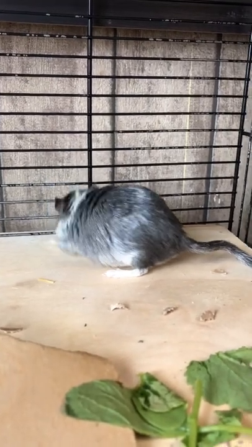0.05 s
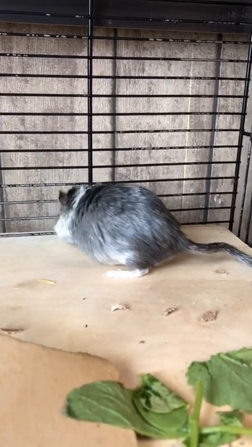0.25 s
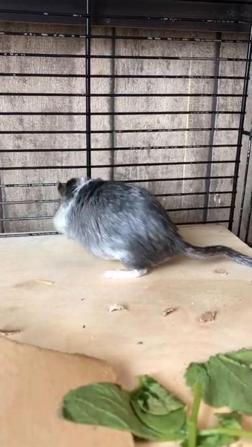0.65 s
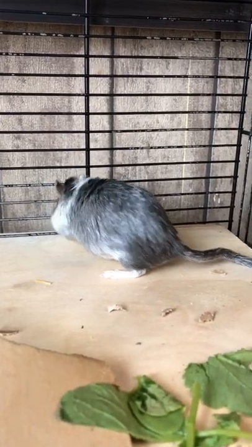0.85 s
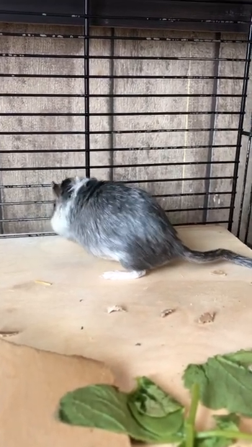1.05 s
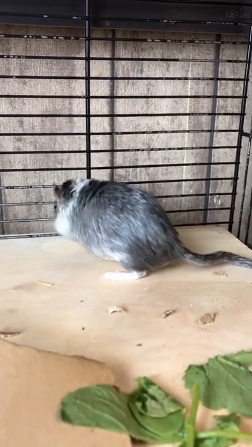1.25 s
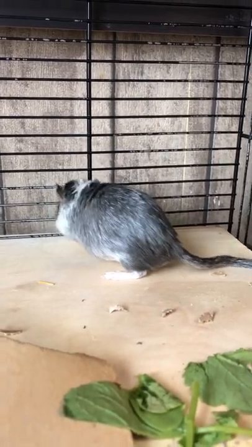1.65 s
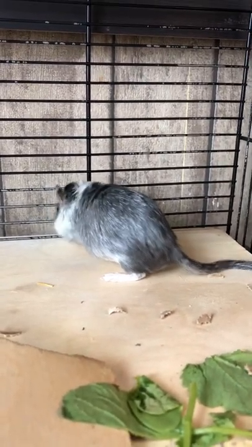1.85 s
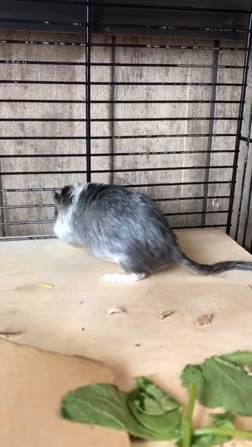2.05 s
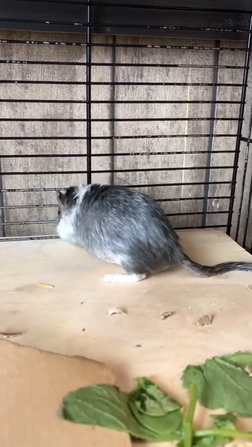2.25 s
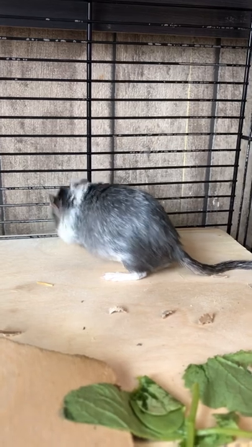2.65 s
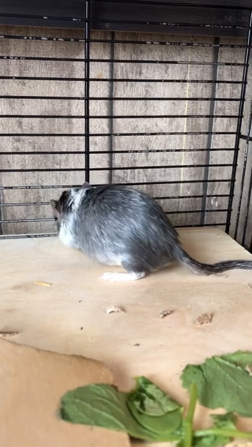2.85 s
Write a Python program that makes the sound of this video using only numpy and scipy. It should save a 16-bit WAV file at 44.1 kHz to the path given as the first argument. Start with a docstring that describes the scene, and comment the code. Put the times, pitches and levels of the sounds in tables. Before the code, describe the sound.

Teeth chattering from a small rodent starts softly, then becomes a dense run of dry, scratchy ticks before ending. It is heard close up, with slight pings from the wire cage and a low, steady indoor hum.

```python
"""A small rodent in a wire cage rattles its teeth, close by, in a quiet room.
Each stroke of the teeth is a tick and a short rasp of tiny slips; hard strokes ring brighter.
The cage and room answer faintly over a low steady hum."""
import sys
import numpy as np
from scipy import signal
from scipy.fft import rfft, irfft, next_fast_len
from scipy.io import wavfile
from scipy.ndimage import map_coordinates

SR = 44100
rng = np.random.default_rng(int(sys.argv[2]) if len(sys.argv) > 2 else 0)


def dump_mix(stems):
    """Bounce the given channels to the path in sys.argv[1] as a 16-bit WAV at rate SR."""
    frames = np.atleast_2d(stems).T  # one column per channel
    limited = np.clip(frames, -1, 1)  # hard clip at full scale
    pcm = np.round(limited * 32767).astype(np.int16)
    wavfile.write(sys.argv[1], SR, pcm)


N = 127890

# tooth strokes: (start s, length s, level dB)
STROKES = [(0.036, 0.0082, -62.5), (0.149, 0.012, -62.5), (0.181, 0.0035, -51.5), (0.2078, 0.0075, -43.5),
           (0.2199, 0.024, -49), (0.2486, 0.019, -46), (0.281, 0.0031, -34), (0.2984, 0.027, -35.5),
           (0.3423, 0.006, -35), (0.3536, 0.01, -37), (0.3654, 0.011, -42.0), (0.3813, 0.0081, -34),
           (0.4133, 0.014, -40.5), (0.4299, 0.01, -35.5), (0.4536, 0.011, -39.0), (0.4707, 0.028, -32.5),
           (0.5144, 0.0066, -30.5), (0.5243, 0.0081, -34.5), (0.5405, 0.008, -39.5), (0.5591, 0.003, -31.5),
           (0.5727, 0.01, -40.5), (0.5909, 0.0047, -35), (0.6056, 0.013, -33), (0.6288, 0.012, -40.5),
           (0.6484, 0.018, -33), (0.688, 0.0038, -33.5), (0.7068, 0.012, -35.5), (0.7317, 0.013, -28.5),
           (0.7654, 0.002, -41), (0.7742, 0.011, -33.5), (0.7986, 0.005, -34), (0.8163, 0.011, -29.5),
           (0.8581, 0.0078, -31.5), (0.8801, 0.0043, -35), (0.8953, 0.0076, -33), (0.9117, 0.0123, -30.5),
           (0.942, 0.0084, -31.5), (0.9791, 0.016, -35.5), (0.9974, 0.0049, -30.5), (1.0349, 0.0046, -34.5),
           (1.0498, 0.0059, -32.5), (1.0721, 0.01, -33), (1.0931, 0.012, -31.5), (1.1152, 0.0034, -36.5),
           (1.1252, 0.0042, -34.5), (1.1402, 0.015, -35), (1.1645, 0.016, -34), (1.1858, 0.03, -36.0),
           (1.229, 0.011, -32.5), (1.2598, 0.01, -35.0), (1.278, 0.017, -34.5), (1.3102, 0.0144, -32.5),
           (1.3691, 0.0032, -35), (1.3932, 0.0091, -37), (1.4246, 0.0019, -43), (1.4337, 0.015, -34.5),
           (1.45, 0.002, -39), (1.4736, 0.012, -27.5), (1.5022, 0.0079, -35.5), (1.5268, 0.01, -35),
           (1.5476, 0.0064, -36), (1.5719, 0.013, -27.5), (1.5991, 0.0056, -32.0), (1.6225, 0.0075, -35),
           (1.6394, 0.0085, -38.0), (1.6571, 0.011, -26.5), (1.6951, 0.0063, -33.5), (1.7151, 0.0033, -30.5),
           (1.7276, 0.016, -39), (1.7513, 0.013, -30), (1.7702, 0.044, -36.5), (1.827, 0.022, -31),
           (1.866, 0.023, -37), (1.8977, 0.0067, -37.5), (1.9173, 0.012, -31.5), (1.9294, 0.0092, -33.0),
           (1.9573, 0.013, -37.5), (1.978, 0.0126, -34), (1.9986, 0.0065, -34.5), (2.0088, 0.028, -34.5),
           (2.0637, 0.015, -32.0), (2.0924, 0.0224, -34), (2.162, 0.0087, -32.5), (2.2015, 0.008, -33),
           (2.2374, 0.013, -39), (2.2615, 0.0014, -28.5), (2.266, 0.015, -39), (2.3005, 0.01, -27.5),
           (2.3308, 0.0068, -37.5), (2.3498, 0.0064, -34.5), (2.3707, 0.037, -38), (2.3974, 0.019, -35),
           (2.4233, 0.01, -39), (2.4424, 0.011, -34), (2.4616, 0.016, -36), (2.4833, 0.0062, -32.0),
           (2.4997, 0.0096, -31.5), (2.5375, 0.011, -36), (2.5595, 0.027, -34), (2.5982, 0.038, -43)]
SLIPS_PER_S, SLIP_SCATTER_DB = 6000, 3
ATTACK_S, RELEASE_S, SWELL_DB = 0.00035, 0.0018, 4.5  # a stroke swells towards its middle
RASP_DB = 0.7
# broad colour of the rasp: (Hz, dB)
RASP = [(150, -31.5), (500, -21), (720, -26), (850, -15.5), (1480, -19), (2200, -12), (3100, -7), (3500, -12), (4100, -13), (5000, -1), (5750, -14.5), (6500, -8), (9500, -14.5), (11700, -8), (13900, -21), (15600, -19)]
# resonances of teeth and cage: (Hz, width Hz, dB)
RESONANCES = [(1065.0, 90.0, -9.5), (1675.0, 56.0, -3.5), (1903.0, 42.0, -4.5), (2113.0, 56.0, -7.0),
              (2402.0, 36.0, -5.0), (2572.0, 56.0, -3.5), (3778.0, 222.0, -7.0), (4467.0, 43.0, -1.0),
              (4640.0, 68.0, 0.0), (5494.0, 96.0, -3.0), (6028.0, 154.0, -1.0), (8070.0, 360.0, -1.0),
              (9176.0, 516.0, -1.0), (9995.0, 216.0, -1.0), (10808.0, 167.0, -2.0)]  # fixed
BITE_HZ, BITE_WIDTH_HZ, BITE_DB = 7040, 405, -6  # the ring of a hard stroke
ROOM = [(200, 0.72), (1700, 0.37), (5000, 0.15), (10000, 0.061), (16000, 0.046)]
ROOM_DB = -12
# room air: (Hz, dB per Hz)
AIR = [(20, -36), (45, -16), (65, -1.5), (100, -6), (185, -1), (230, -10), (500, -12.5), (720, -20), (1700, -31), (16000, -40.5)]
AIR_DB = -59.5
HUM = [(71, -71.5), (119, -74), (161, -61.5)]
# low murmur of the cage floor under the animal: (Hz, width Hz, dB)
BOARD_HZ, BOARD_WIDTH_HZ, BOARD_DB = 170, 66, -25.5
TOP_HZ = 15830  # fixed
# long faint ring of the cage wires: (Hz, dB, t60 s)
WIRES = [(1640, -27.5, 0.67), (2400, -38.5, 0.36), (10000, -38.5, .3)]
PING_HZ, PING_SCATTER_HZ, PING_T60_S = 4630, 150, 0.024  # the ring of the near bars
CHATTER_DB, CHATTER_PER_S = 1, 450  # the grip wavers within a stroke
SCATTER_DB, SCATTER_S = -10, 0.00057  # reflections off the floor and bars, new for each stroke
COLOUR_DB, COLOUR_STEP_HZ = 0.42, 1408  # each stroke has a colour of its own
HUM_WAVER_DB = 4
USUAL_DB, BITE_GROWS = -36, 1  # the ring gains this much for each dB above a usual stroke
TICK_SCATTER_DB = None
DRAG_FROM_S, DRAG_TO_S, DRAG_DB = .21, 2.635, -51  # light rubbing between strokes
DARKEN_DB, DARKEN_HZ = 4.5, 7300  # over a stroke the weight shifts from above this pitch to below it
RESONANCE_SCATTER_DB = 1.5  # each stroke stirs the resonances in its own proportions
# one of the cage bars pings as some strokes let go: (s, level dB)
PINGS = [(.532, -36), (.613, -34), (.782, -33.5), (.866, -37), (1.664, -35), (1.986, -41), (2.208, -40), (2.309, -33.5)]
TICK_DB, TICK_GROWS, TICK_S = -29.5, 0.26, 0.00052  # the teeth catch at the start of a usual stroke; dB gained for each dB harder
BARS_WIDTH_HZ, BARS_DB, BARS_DELAY_S = 450, -19, 0.0076  # the near bars answer every stroke a moment later


def amp(db):
    """Decibels to gain."""
    return 10 ** (np.asarray(db) / 20)


def unit(x):
    """Scale to rms 1."""
    return x / np.sqrt(np.mean(x ** 2) + 1e-20)


def along(points, hz):
    """(Hz, value) points on a log axis."""
    f, v = np.transpose(points)
    return np.interp(np.log(hz + 1), np.log(f + 1), v)


def wobble(rate):
    """A smooth random curve, rate knots a second."""
    return map_coordinates(rng.standard_normal(int(N * rate / SR) + 4), [np.arange(N) * rate / SR])


def resonance(f, hz, width_hz):
    """Gain of one resonance, 1 at its top."""
    return np.abs(f * width_hz / (hz * hz - f * f + 1j * f * width_hz))


def coloured(x, gain, size=16384):
    """x through a causal filter of energy 1 with the shape gain(Hz)."""
    cep = irfft(np.log(np.maximum(gain(np.fft.rfftfreq(size, 1 / SR)), 1e-6)))
    cep[1:size // 2] *= 2
    cep[size // 2 + 1:] = 0
    ring = irfft(np.exp(rfft(cep)))
    return signal.fftconvolve(x, ring / np.linalg.norm(ring))[:N]


def slips(rate):
    """Tiny slips of random size at random moments, rms 1."""
    sizes = amp(SLIP_SCATTER_DB * rng.standard_normal(N)) * rng.choice([-1, 1], N)
    return unit(sizes * (rng.random(N) < rate / SR))


def strokes(rows, size=4096):
    """Each stroke catches with a tick, swells, darkens and lets go; a hard one rings brightly. Returns sound and force."""
    sound, force, t = np.zeros(N), np.zeros(N), np.arange(size) / SR
    f = np.fft.rfftfreq(size, 1 / SR)
    bright = coloured([1.], lambda f: resonance(f, BITE_HZ, BITE_WIDTH_HZ))[:size]
    grain, catch = slips(SLIPS_PER_S) * amp(CHATTER_DB * wobble(CHATTER_PER_S)), rng.standard_normal(N)
    for (s, length, db), stir in zip(rows, rng.standard_normal((len(rows), len(RESONANCES)))):
        at, length = slice(round(s * SR), round(s * SR) + size), max(length, TICK_S)
        to_level = lambda x: x[:size] * amp(db) * np.sqrt(length * SR) / np.linalg.norm(x)
        progress = np.minimum(t / length, 1)
        swell = amp(SWELL_DB * (np.sin(np.pi * progress) - 0.5))
        shape = (1 - np.exp(-t / ATTACK_S)) * swell * np.exp(-np.maximum(t - length, 0) / RELEASE_S)
        dull, darken = irfft(rfft(grain[at]) * (f < DARKEN_HZ)), amp(DARKEN_DB * (progress - 0.5))
        rub = shape * (dull * darken + (grain[at] - dull) / darken)
        tick = amp(TICK_DB + TICK_GROWS * (db - USUAL_DB)) * np.exp(-t / TICK_S) * catch[at]
        rasp = to_level(scattered(to_level(rub) + tick) * (t < length + 10 * RELEASE_S))
        force[at] += rasp
        plain = coloured(rasp, lambda f: body(f, RESONANCE_SCATTER_DB * stir), size=size)
        bite = amp(BITE_DB + BITE_GROWS * (db - USUAL_DB)) * to_level(signal.fftconvolve(rasp * swell, bright))
        sound[at] += to_level(to_level(plain) + bite)
    return sound, force


def teeth():
    """Strokes with light rubbing between them; both ring the cage wires, and the strokes shake the floor."""
    sound, force = strokes(STROKES)
    t = np.arange(N) / SR
    drag = amp(DRAG_DB) * ((t > DRAG_FROM_S) & (t < DRAG_TO_S)) * slips(SLIPS_PER_S)
    board = coloured(force, lambda f: resonance(f, BOARD_HZ, BOARD_WIDTH_HZ) ** 2)
    return amp(RASP_DB) * sound + coloured(drag, body) + amp(BOARD_DB) * board + wires(force + drag)


def room(x):
    """A faint tail in which each frequency dies at its own speed."""
    hz, t, z = signal.stft(rng.standard_normal(SR // 2), SR, nperseg=256)
    tail = signal.istft(z * amp(-60 * t / along(ROOM, hz)[:, None]), SR, nperseg=256)[1]
    return signal.fftconvolve(x, tail / np.linalg.norm(tail))[:N]


def background():
    """Room air and a low hum that wavers."""
    t = np.arange(N) / SR
    hum = sum(amp(db + HUM_WAVER_DB * wobble(11.02)) * np.sqrt(2) * np.sin(2 * np.pi * hz * t + 1.3 * wobble(7)) for hz, db in HUM)
    return hum + amp(AIR_DB) * unit(coloured(rng.standard_normal(N), lambda f: amp(along(AIR, f))))


def scattered(x):
    """One stroke with its own smooth colour and its own cluster of near reflections."""
    t, f = np.arange(len(x)) / SR, np.fft.rfftfreq(len(x), 1 / SR)
    near = rng.standard_normal(len(x)) * np.exp(-t / SCATTER_S)
    colour = amp(COLOUR_DB * map_coordinates(rng.standard_normal(size=64), [f / COLOUR_STEP_HZ], mode="nearest"))
    return irfft(rfft(x) * colour * (1 + amp(SCATTER_DB) * rfft(near / np.linalg.norm(near))), len(x))


def wires(force):
    """The near bars answer briefly; the long wires ring on faintly."""
    t = np.arange(SR) / SR
    rings = sum(amp(db) * unit(np.sin(2 * np.pi * hz * t) * amp(-60 * t / t60)) for hz, db, t60 in WIRES) / np.sqrt(SR)
    late = np.pad(force, (round(abs(BARS_DELAY_S) * SR), 0))
    bars = coloured(late, lambda f: resonance(f, PING_HZ, BARS_WIDTH_HZ) ** 2)
    return signal.fftconvolve(force, rings)[:N] + amp(BARS_DB) * bars


def body(f, stir_db=0):
    """Gain of teeth and cage: a broad colour with resonances on it, each raised or lowered by stir_db."""
    hz, width, db = np.transpose(RESONANCES)
    peaks = amp(db + stir_db) * resonance(f[:, None], hz, width) ** 1.7
    return np.sqrt(amp(along(RASP, f)) ** 2 + np.sum(peaks ** 2, axis=1))


def pings():
    """Short bright rings of the near bars, each at a slightly different pitch."""
    sound = np.zeros(N)
    for (s, db), chance in zip(PINGS, rng.uniform(-0.78, 1, len(PINGS))):
        t = np.maximum(np.arange(N) / SR - s, 0)
        envelope = (1 - np.exp(-t / ATTACK_S)) * amp(db - 60 * t / PING_T60_S)
        sound += 2 * envelope * np.sin(2 * np.pi * (PING_HZ + PING_SCATTER_HZ * chance) * t)
    return sound


def scene():
    """The rattle, its room tail and the background."""
    rattle = teeth() + pings()
    return (rattle + amp(ROOM_DB) * room(rattle) + background())[None]


def record(dry):
    """The recorder keeps nothing above its band limit."""
    m = next_fast_len(N + SR // 2)
    return irfft(rfft(dry, m) * (np.fft.rfftfreq(m, 1 / SR) < TOP_HZ), m)[..., :N]


dry = scene()
out = record(dry)
dump_mix(out)
```